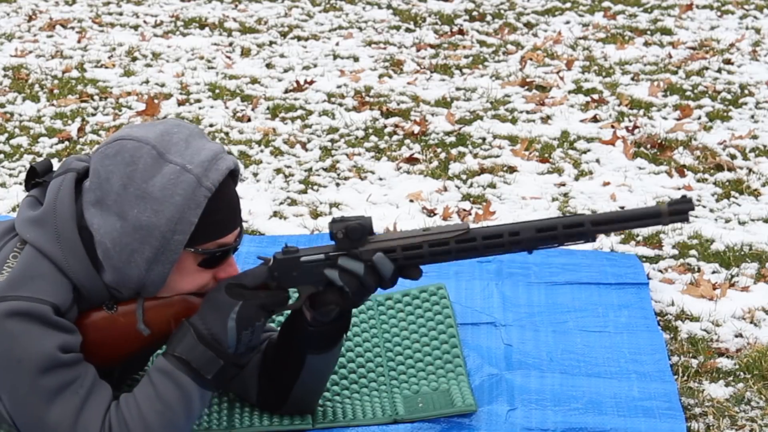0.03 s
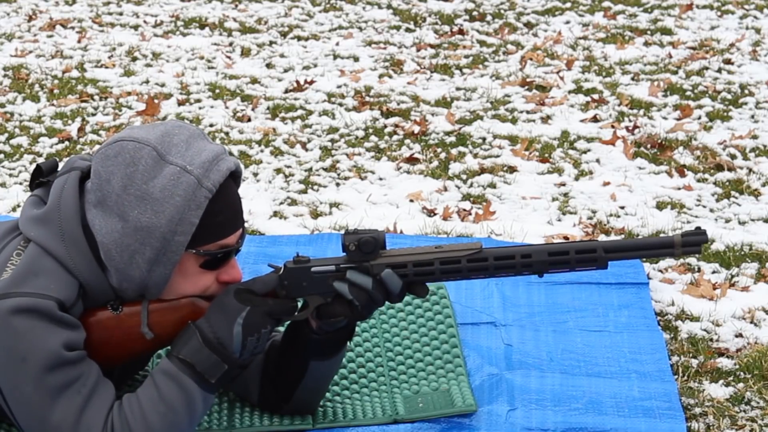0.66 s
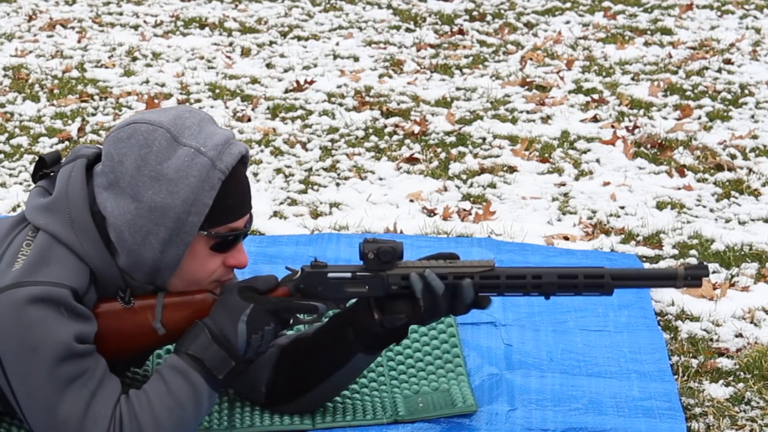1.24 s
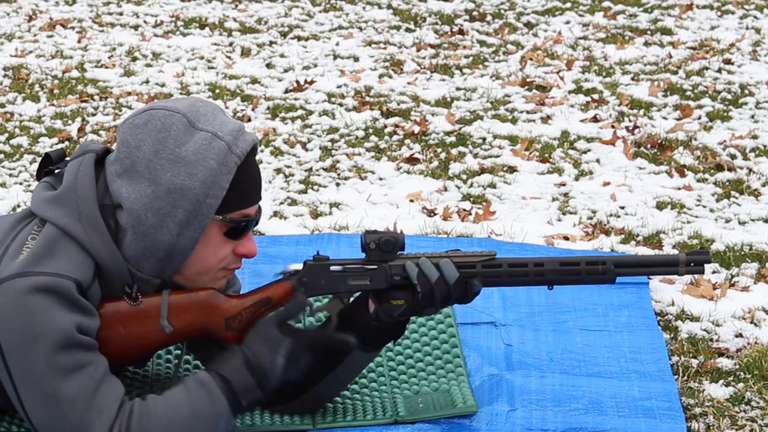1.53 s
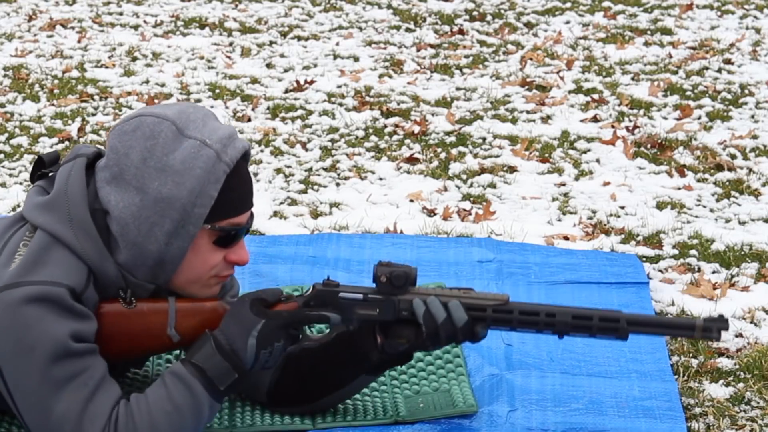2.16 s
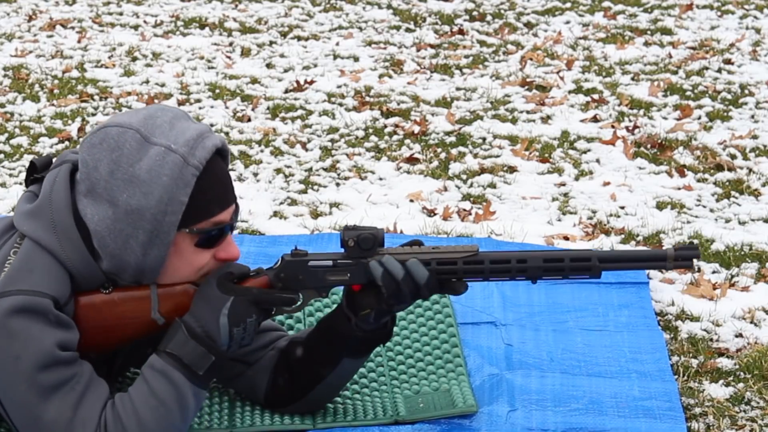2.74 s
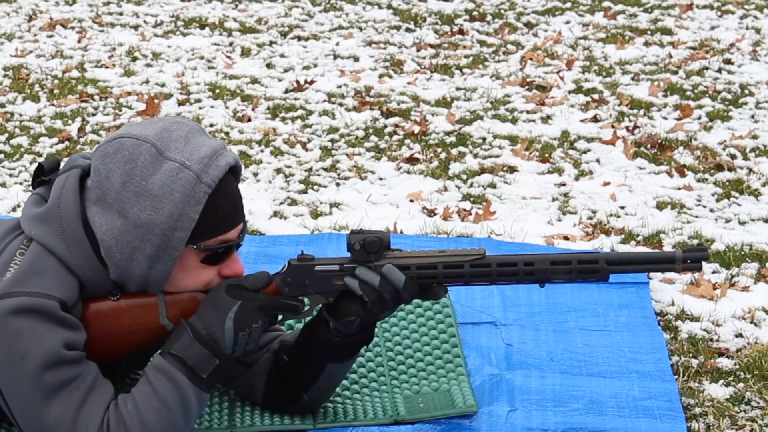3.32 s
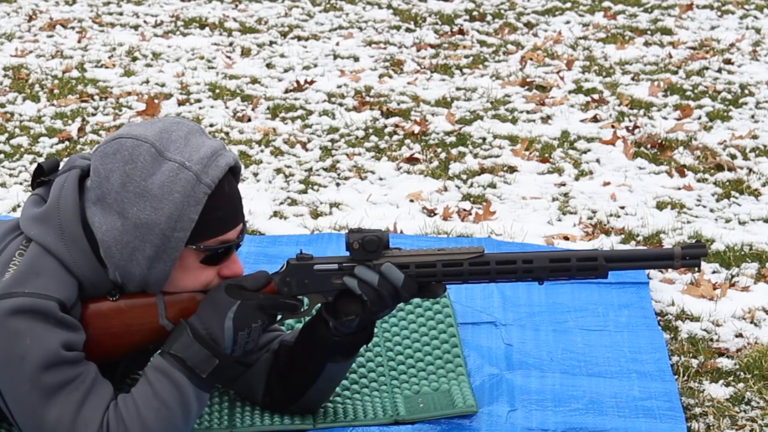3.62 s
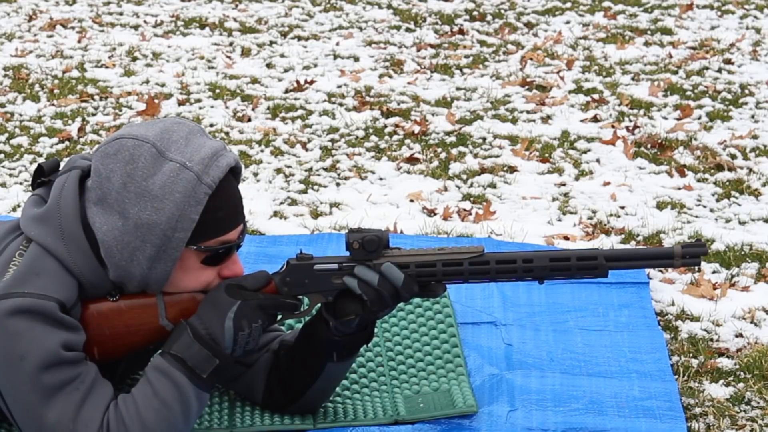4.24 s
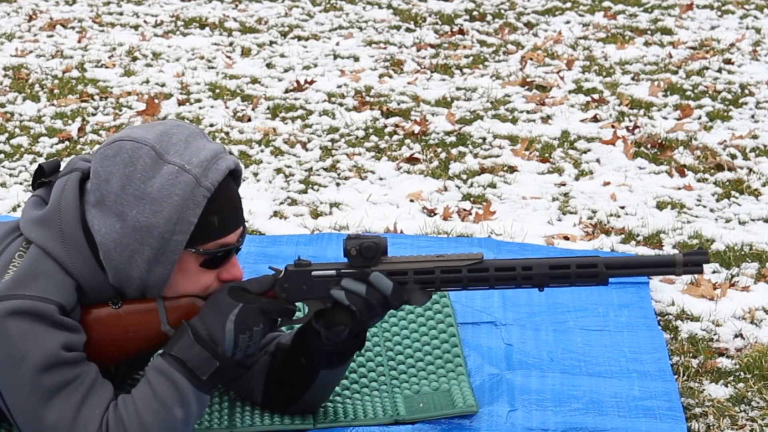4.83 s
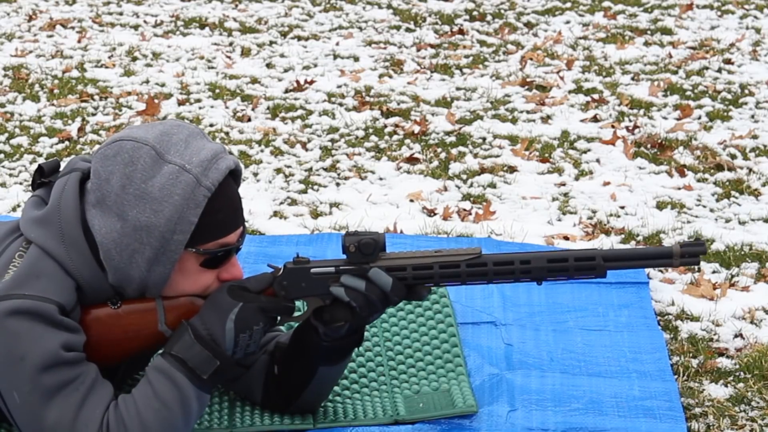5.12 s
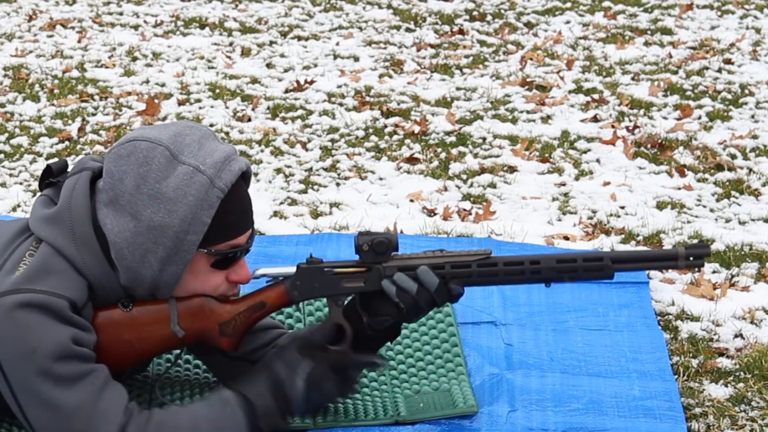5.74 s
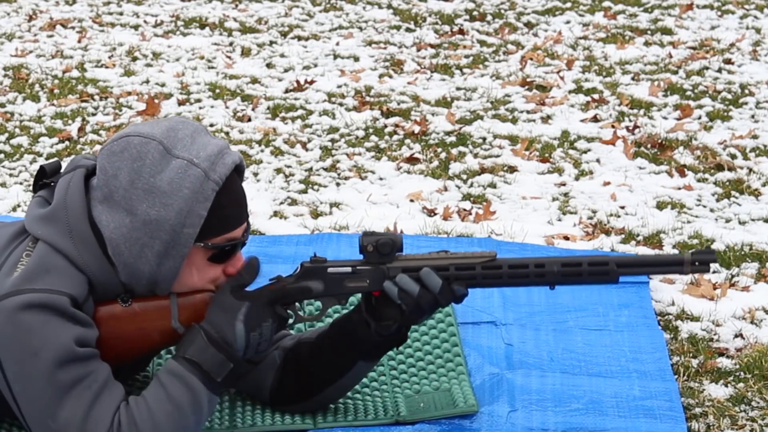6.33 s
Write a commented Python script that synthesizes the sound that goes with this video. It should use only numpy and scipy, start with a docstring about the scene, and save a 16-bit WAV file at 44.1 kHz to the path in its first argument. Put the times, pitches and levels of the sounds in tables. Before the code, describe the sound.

Two thin, choked rifle shots sound about four and a half seconds apart over a still field, each rolling back from the trees while a far steel plate rings from the hit. About a second after each shot, close to the microphone, the lever action scrapes and clacks open and shut, flicking out a ringing brass case. Soft knocks of stock and glove and a light brush of fabric accompany the handling.

```python
"""A lever-action rifle, fired twice by a prone shooter over a quiet, snowy field.
The report is thin and choked; the tree lines throw it back, ever duller with distance,
and a far steel target rings under the bullet. After each shot the shooter works the lever:
the bolt scrapes, steel clacks on steel and the spent brass case flies out ringing,
with dull knocks of stock and glove and the soft brush of a sleeve on the mat."""
import sys
import numpy as np
from scipy import signal
from scipy.io import wavfile
from scipy.ndimage import uniform_filter1d

SR = 44100
rng = np.random.default_rng(int(sys.argv[2]) if len(sys.argv) > 2 else 0)


def file_out(sig):
    """Save sig as 16-bit WAV at sys.argv[1]."""
    # one column per channel
    cols = np.atleast_2d(sig).T
    # limit, then scale
    lim = np.clip(cols, -1, 1)
    pcm = np.round(lim * 32767).astype(np.int16)
    wavfile.write(sys.argv[1], SR, pcm)


N = 280917
T = np.arange(N) / SR


def gain_of(db):
    """Decibels to a factor."""
    return 10 ** (np.asarray(db) / 20)


def unit_rms(x):
    """Scales to rms 1."""
    return x / np.sqrt(np.mean(x ** 2) + 1e-20)


def add(mix, start_s, sound):
    """Drops a sound into the mix."""
    part = mix[max(round(start_s * SR), 0):][:len(sound)]
    part += sound[:len(part)]


def eq(x, curve, tilt_db=0., size=4096):
    """Causal EQ through (Hz, dB) points, tilted in dB per octave, its highest point at unity gain."""
    octave = np.log2(abs(np.fft.fftfreq(size, 1 / SR)) + 1)
    hz, db = np.transpose(curve)
    db = np.interp(octave, np.log2(hz + 1), db) + tilt_db * np.clip(octave, np.log2(hz[0] + 1), None)
    log_gain = np.log(gain_of(np.maximum(db - db.max(), -100)))
    taps = np.fft.ifft(np.exp(np.conj(signal.hilbert(log_gain)))).real  # minimum phase
    return signal.oaconvolve(x, taps)[:len(x)]


def noise(curve, n=N):
    """Noise shaped by an EQ curve, at rms 1."""
    return unit_rms(eq(rng.standard_normal(n), curve))


def wander(first, second):
    """Slow random movement: noise smoothed over two spans, given in samples."""
    return unit_rms(uniform_filter1d(uniform_filter1d(rng.standard_normal(N), first), second))


def fade(t, t60):
    """Exponential decay, 60 dB down after t60 seconds."""
    return np.exp(-np.log(1000) * t / np.maximum(t60, 1e-3))


def ring(modes, t):
    """Decaying modes of a struck body, each at a random phase."""
    return sum(gain_of(db) * fade(t, t60) * np.sin(2 * np.pi * (hz * t + rng.random()))
               for hz, db, t60 in modes)


def grains(per_s, spread_db):
    """A train of clicks of random sign and size."""
    size = gain_of(spread_db * np.minimum(rng.exponential(1, N), 4))
    return unit_rms(size * rng.choice([-1, 1], N) * (rng.random(N) < per_s / SR))


def absorb(x, loss_db, power=2.19, size=256):
    """Air takes more treble the longer the path (loss_db at 4 kHz); the overall level is kept."""
    hz, t, spectrum = signal.stft(x, SR, nperseg=size)
    passed = gain_of(-np.interp(t, T, loss_db) * (hz[:, None] / 4000) ** power)
    energy = np.mean(abs(spectrum) ** 2, 1, keepdims=True)
    level_left = np.sqrt((energy * passed ** 2).sum(0) / energy.sum())
    return signal.istft(spectrum * passed / level_left, SR, nperseg=size)[1][:N]


# A faint far tone. Each row: pitch in Hz, level in dB.
FAR_TONE = [(500.6, -73)]

def field_air(level_db=-64.5):
    """The quiet of the open field: a low bed of noise with a faint steady tone."""
    tone = sum(gain_of(db) * unit_rms(np.sin(2 * np.pi * hz * T)) for hz, db in FAR_TONE)
    bed = noise([(24, -54.5), (40, -20), (171, -1.5), (337, -10.5), (503, -7.5), (630, -7),
                 (1020, -11), (2320, -33.5), (13800, -33.5), (16000, -49)])
    return gain_of(level_db) * bed + tone


# The thin tone of the report. Each row: frequency in Hz, gain in dB.
REPORT_EQ = [(120, -35), (200, -18.5), (791, 0), (1160, -8.5), (3490, 0), (8740, -16.5), (11300, -16.5),
             (16000, -23)]

def report():
    """The hammer's dry snap, a tick, then a thin hiss that dulls as it dies over a hollow swell."""
    hiss = absorb(noise(REPORT_EQ), loss_db=5 * np.minimum(T / .1, 1) ** 2, power=1.5)
    snap = noise([(900, -17), (2000, 1), (3700, 1.5), (7000, -30)])
    hollow = noise([(120, -32.5), (300, 21.5), (600, 23.0), (1200, -32.5)])
    out = gain_of(-31) * snap * fade(T, 0.032)
    add(out, .011, gain_of(-19) * hiss * fade(T, 0.0011))  # the tick
    add(out, .02, gain_of(-32.5) * hiss * fade(T, 0.53))
    add(out, .035, gain_of(-39) * hollow[:SR // 6] * signal.windows.tukey(SR // 6))
    return out


# The near ground, then stands of trees, near to far. Each row: delay in seconds, depth in seconds, roar level
# in dB, # boom level in dB, sag in dB per second, added decay behind it as t60 in seconds.
TREE_STANDS = [(0.004, 0.19, -45.5, -44.5, 18, 0.11), (0.131, 0.031, -20, -26.5, 37, 0.39),
               (0.188, 0.011, -19, -17, 48.5, 0.54), (0.273, 0.21, -18, -24.5, 64, 2.7),
               (0.464, 0.53, -17.5, -30.5, 15.5, 0.68), (1.001, 0.5, -26, -33, 8.5, 0.95),
               (1.502, 5.8, -42, -47, 14, 2.0)]

def stand_envelopes(rise_share=0.038):
    """Roar and boom levels: each stand swells, sags while the shot crosses its depth, then dies away."""
    power = np.zeros((2, N))
    for delay, depth, roar_db, boom_db, sag_db, t60 in TREE_STANDS:
        t = np.maximum(T - delay, 0)
        attack = np.minimum(t / (rise_share * delay), 1)  # softer with distance
        shape = attack * gain_of(-sag_db * t) * fade(np.maximum(t - depth, 0), t60)
        power += (gain_of([[roar_db], [boom_db]]) * shape) ** 2
    return np.sqrt(power)


# The roar off trunks and branches, and the boom under it. Each row: frequency in Hz, gain in dB.
ROAR_EQ = [(180, -41.5), (300, -8.5), (405, -13), (614, -1.5), (1060, 1.5), (1690, -2), (3460, -3.5),
           (4520, -14), (4750, -12.5), (5160, -15.5), (6200, -21.5), (8090, -31.5), (11300, -46),
           (16000, -71.5)]
BOOM_EQ = [(50, -42), (85, -20.5), (125, -8), (190, 3.5), (260, 1.5), (400, -3.5), (2000, -66)]

def woods(near_scatter, loss_db_per_s, steady_s=0.35, bright_s=0.49, deepen_s=2.0, clump_db=0.66):
    """Countless small echoes; the near ones repeat from shot to shot, moving air reshuffles the far."""
    near = np.exp(-(T / steady_s) ** 4)
    scatter = near * near_scatter + np.sqrt(1 - near ** 2) * grains(per_s=6000, spread_db=2.5)
    loss_db = loss_db_per_s * np.maximum(T - bright_s, 0)
    roar = absorb(unit_rms(eq(scatter, ROAR_EQ)), loss_db) * gain_of(clump_db * wander(700, 500))
    far = np.minimum(T / deepen_s, 1)
    deep_boom = unit_rms(eq(scatter, BOOM_EQ, tilt_db=-4))
    boom = (1 - far) * unit_rms(eq(scatter, BOOM_EQ)) + far * deep_boom
    roar_level, boom_level = stand_envelopes()
    return roar * roar_level + boom * boom_level


# Sharp echo slaps, and one longer bright sizzle just after the shot.
# Each row: delay in seconds, level in dB, centre in Hz, t60 in seconds.
SLAPS_AND_SIZZLE = [(0.097, -22.5, 585, 0.0089), (0.123, -13, 420, 0.02), (0.1237, -20, 4570, 0.48),
                    (0.14, -15.5, 200, 0.13), (0.155, -9.5, 700, 0.09), (0.1984, -10, 2600, 0.016),
                    (0.2258, -3.5, 1990, 0.16), (0.276, -9.5, 1393, 0.068), (0.3002, -2.5, 1920, 0.016),
                    (0.3409, -2, 1550, 0.046), (0.3748, -9.5, 1850, 0.18), (0.469, -12, 970, .08),
                    (0.525, -31, 2080, 0.0071), (0.602, -8, 805, 0.096)]

def slaps_and_sizzle(front=9.0, skirt_db=-20.5, outer_db=-33.0):
    """Sharp echo slaps and one longer bright sizzle: each a click and fading noise in its own band."""
    out, t = np.zeros(N), T[:SR // 6]
    for delay, db, hz, t60 in SLAPS_AND_SIZZLE:
        burst = rng.standard_normal(len(t)) * fade(t, t60) + front * (t == 0)
        burst = eq(burst, [(hz / 6, outer_db), (hz / 9.7, skirt_db), (hz, 0),
                           (hz * 2.97, skirt_db), (hz * 5, outer_db), (hz * 10, -90)])
        add(out, delay, gain_of(db) * burst / abs(burst).max())
    return eq(out, [(50, -46), (135, -1.5), (8000, -3.5), (15000, -13)])


# The target's long ring. Each row: pitch in Hz, level in dB, t60 in seconds before extra damping.
TARGET_MODES = [(1534, -37, 2.5), (1938, -41, 2), (2460, -40, 2), (3542, -37, 1.3), (3822, -33, 1.7),
                (4097, -44, 1.2), (4393, -39, 1.4), (4980, -43, .7), (5146, -40, .9), (8091, -46, .5),
                (9572, -52, .3)]

def steel_target(crash_modes, db_per_khz=-4.0, damp_db_per_s=6.5):
    """The bullet splashes on the plate: a crash of brief modes; the long ones swell through the trees."""
    t = T[:2 * SR]
    crash = ring([(hz, db + db_per_khz * hz / 1000, min(0.71 * 8000 / hz, 1))
                  for hz, db in crash_modes], t)
    splash = noise([(800, -20.5), (2500, 9), (16000, -36.5)], len(t)) * fade(t, 0.27)
    impact = gain_of(-31.5) * crash + gain_of(-33.5) * splash
    tail = gain_of(6.5 - damp_db_per_s * t) * ring(TARGET_MODES, t)
    attack, bloom = 1 - np.exp(-t / .025), 1 - np.exp(-t / .1)
    return impact * attack + tail * bloom


# The two shots. Each row: start in seconds, gain of the far echoes in dB, gain of the target in dB,
# air loss at 4 kHz in dB per second of travel.
SHOTS = [(0.088, 0.55, 2.5, 27), (4.6922, 0.6, 7, 24.5)]

def rifle_shots(target_delay_s=.39):
    """Report, echoes and, after the bullet's flight and the sound's way back, the target's ring."""
    out = np.zeros(N)
    near_scatter, bursts = grains(per_s=9000, spread_db=1.0), slaps_and_sizzle()
    crash_modes = np.column_stack([rng.uniform(900, 15000, size=50), rng.uniform(-5, 5, size=50)])
    for start, far_db, target_db, loss_db_per_s in SHOTS:
        carry = gain_of(far_db * np.minimum(T, 1) ** 2)
        add(out, start - .02, report())  # the hammer falls just ahead of the shot
        add(out, start, carry * woods(near_scatter, loss_db_per_s) + bursts)
        add(out, start + target_delay_s, gain_of(target_db) * steel_target(crash_modes))
    return out


# The bright tone of the action's steel. Each row: frequency in Hz, gain in dB.
STEEL_EQ = [(410, -59.5), (700, -20), (1120, -5), (1330, -8.5), (1870, -3.5), (2560, -5.5), (3280, 0),
            (5470, -11), (8100, -13.5), (10700, -20), (12500, -22), (13000, -24.5), (16000, -31.5)]
# The bolt slides back, then home.
# Each row: start, fastest moment and stop in seconds, scrape level in dB, zing level in dB.
BOLT_STROKES = [(1.568, 1.686, 1.833, -29.5, -32), (1.977, 2.058, 2.125, -27, -37),
                (5.792, 5.861, 5.97, -28.5, -32), (6.309, 6.315, 6.55, -35, -52)]

def bolt_slides(slow_scrape_db=-13.5, slow_zing_db=-30, ease_s=0.075):
    """Tiny slips of steel on steel and the zing of brass along the chamber; both grow with speed."""
    scrape = unit_rms(eq(grains(per_s=2600, spread_db=2.5), STEEL_EQ, tilt_db=-3))
    brass_eq = [(5000, -60.5), (11000, -24), (12000, 10), (12800, -5.5), (13800, -11.5), (16000, -21.5)]
    zing = unit_rms(eq(grains(per_s=4000, spread_db=1.5), brass_eq))
    out = np.zeros(N)
    for start, fastest, stop, scrape_db, zing_db in BOLT_STROKES:
        slowness = np.interp(T, [start, fastest, stop], [1, 0, 1])
        slide = scrape * gain_of(scrape_db + slow_scrape_db * slowness)
        slide += zing * gain_of(zing_db + slow_zing_db * slowness)
        out += slide * (T > start) * np.clip((stop - T) / ease_s, 0, 1)  # the hand eases it to rest
    return out


# The receiver's main ring. Each row: pitch in Hz, level in dB, t60 in seconds before the hands damp it.
RECEIVER_MODES = [(3170, -0.5, 0.47), (3368, -1.5, 0.83), (3752, -9, 5.0), (3900, -6, 0.27)]
# Steel hits steel in the action. Each row: start in seconds, level in dB, tilt in dB per octave.
CLACKS = [(1.6137, -12.5, 4.5), (1.6367, -23.5, 9), (1.6935, -14, -2.5), (1.7114, -20, 9),
          (1.7439, -13, -0.5), (1.7694, -15, 5.5), (1.7862, -10, 1), (1.8024, -13, -2.5),
          (1.9839, -18, -2.5), (2.0348, -5.5, -3.5), (2.0444, -13, -4.5), (2.0634, -12.5, 6),
          (2.0677, -10.5, -5), (2.0804, -19, 5), (2.2438, -31.5, -6.5), (5.8052, -28, 4), (5.8301, -24, 6),
          (5.8563, -20.5, 9), (5.8691, -15, 0), (5.9339, -9, -3), (5.9539, -17.5, -2.5),
          (6.1724, -21.5, -1), (6.321, -17, -7), (6.3634, -23.5, -1)]

def action_clacks(trim_db=2.5, grip_t60=0.04):
    """Lever, bolt and carrier hit their stops: a crack, the receiver's ring, overtones that vary."""
    out, t = np.zeros(N), T[:SR // 6]
    overtones_hz = np.geomspace(1000, 13000, num=32) * rng.uniform(.96, 1.04, size=32)
    for start, db, tilt_db in CLACKS:
        crack = rng.standard_normal(len(t)) * (fade(t, 0.036) + 0.4 * fade(t, 0.0051))
        overtones = ring([(hz, -22.5 - rng.exponential(30), 0.11) for hz in overtones_hz], t)
        body = gain_of(-10) * ring(RECEIVER_MODES, t) * fade(t, grip_t60)
        hit = eq(crack + overtones + body, STEEL_EQ, tilt_db)
        add(out, start, gain_of(db + trim_db) * hit / abs(hit).max())
    return out


# Spent brass: three body modes, then two of the mouth. Each row: pitch in Hz, level in dB, t60 in seconds.
CASE_MODES = [(6990, -14, .13), (10900, -8, .21), (15340, -14, .15), (12335, -5, .18), (12378, 0, .2)]
# Pings of the ejected case. Each row: start in seconds, level in dB, the mouth's share from 0 to 1.
CASE_PINGS = [(1.790, -27, 1.0), (1.803, -19, 0.74), (5.935, -34, 0.8), (5.952, -30, 0)]

def spent_cases(tumble_hz=27., tumble_depth=0.31):
    """The ejector flicks the case's mouth; then it clips the port, rings all over and tumbles away."""
    out, t = np.zeros(N), T[:SR // 2]
    tumble = 1 + tumble_depth * np.cos(2 * np.pi * tumble_hz * t)
    for start, db, mouth in CASE_PINGS:
        ping = mouth * ring(CASE_MODES[3:], t) + 2 * (1 - mouth) * ring(CASE_MODES[:3], t)
        add(out, start, gain_of(db) * ping * tumble)
    return out


# Dull knocks of stock and glove. Each row: start in seconds, level in dB, pitch in Hz, t60 in seconds.
KNOCKS = [(1.998, -19.5, 1520, 0.0064), (2.142, -29, 2850, 0.0047), (2.167, -20, 1960, 0.0058),
          (2.2432, -39.5, 1700, 0.0079), (2.313, -47.5, 3600, 0.0048), (3.664, -64, 3500, 0.0077),
          (4.348, -59, 3610, 0.014), (6.058, -29, 3180, 0.0034), (6.165, -23, 284, 0.032),
          (6.174, -12, 456, 0.013)]

def stock_knocks(tick_db=-7.0):
    """Heavily damped blows: a few cycles with a soft attack and a little noise."""
    out, t = np.zeros(N), T[:SR // 8]
    for start, db, hz, t60 in KNOCKS:
        shape = t * fade(t, t60)
        tick = noise([(hz / 10, -50), (hz / 2, -12), (hz, 0), (hz * 5, -42)], len(t))
        knock = np.sin(2 * np.pi * hz * t) + gain_of(tick_db) * tick
        add(out, start, gain_of(db) * knock * shape / shape.max())
    return out


# The arm moves on the mat. Each row: busiest moment in seconds, level in dB.
ARM_MOVES = [(2.101, -56), (6.301, -60)]

def sleeve_rustle(settle_s=0.32, uneven_db=2.5):
    """Fabric brushes softly and unevenly around each movement of the arm, with faint small ticks."""
    brush = rng.standard_normal(N) + 0.2 * grains(per_s=25, spread_db=-0.5)
    motion = sum(gain_of(db) / (1 + abs(T - busiest) / settle_s) ** 1.61 for busiest, db in ARM_MOVES)
    folds = gain_of(uneven_db * wander(4000, 2000))
    return unit_rms(eq(brush, STEEL_EQ, tilt_db=-0.5)) * motion * folds


def scene():
    """The mono mix, heard from beside the shooter."""
    return (field_air() + rifle_shots() + bolt_slides() + action_clacks()
            + spent_cases() + stock_knocks() + sleeve_rustle())[None]


def record(dry, cutoff_hz=16000):
    """A steep high cut takes off the very top."""
    high_cut = signal.firwin(511, cutoff_hz, window=("kaiser", 9), fs=SR)
    return signal.oaconvolve(dry, high_cut[None], "same")


dry = scene()
out = record(dry)
file_out(out)
```